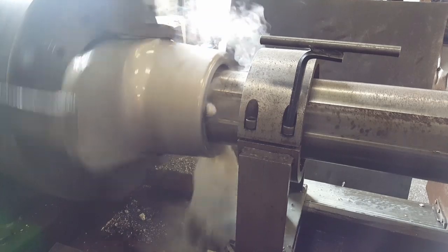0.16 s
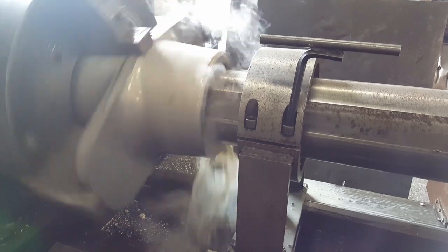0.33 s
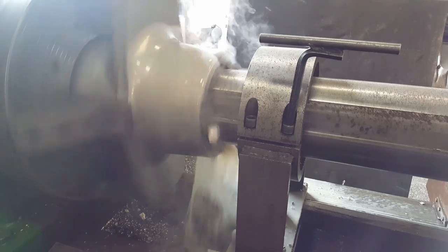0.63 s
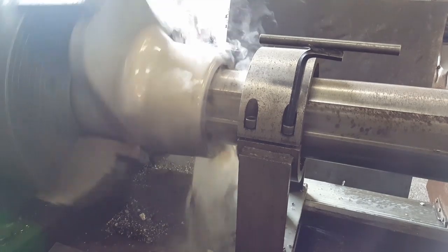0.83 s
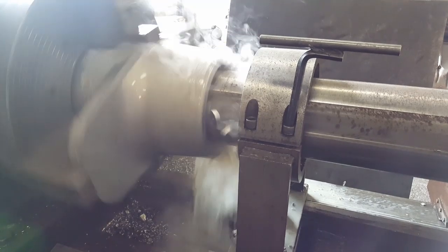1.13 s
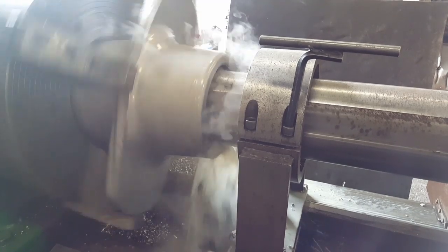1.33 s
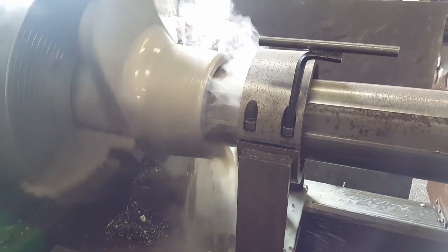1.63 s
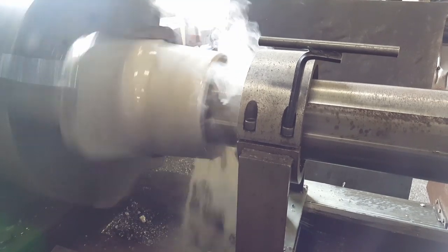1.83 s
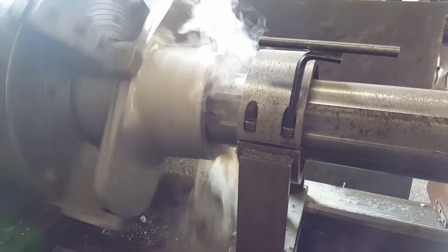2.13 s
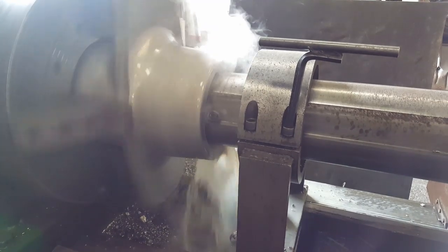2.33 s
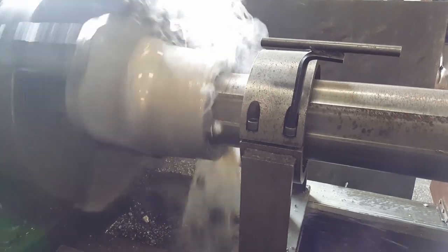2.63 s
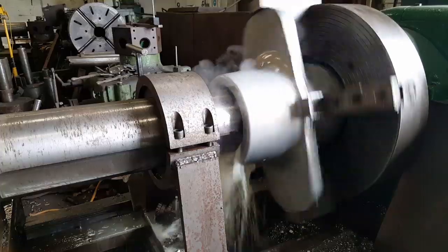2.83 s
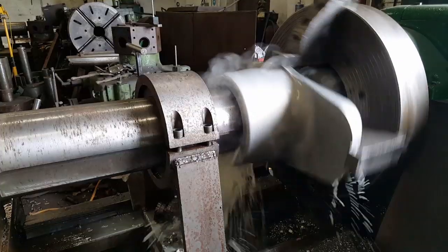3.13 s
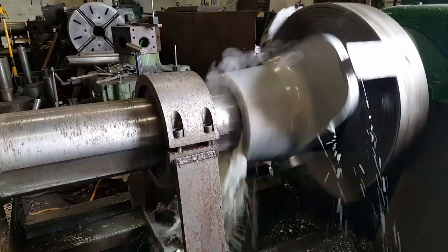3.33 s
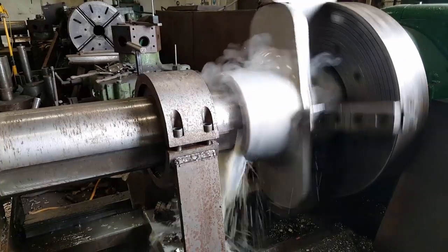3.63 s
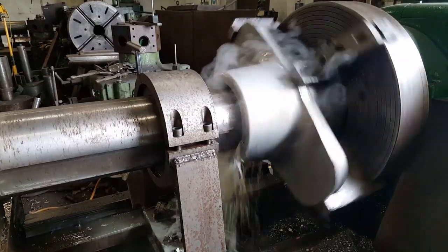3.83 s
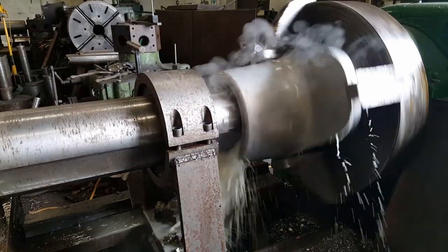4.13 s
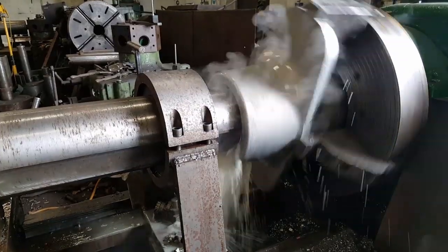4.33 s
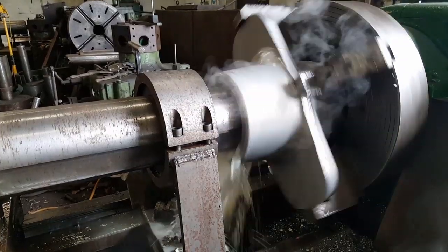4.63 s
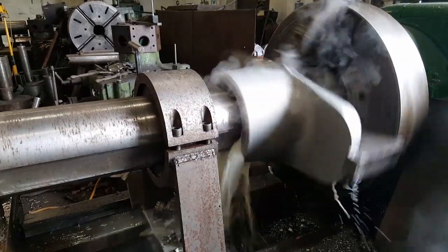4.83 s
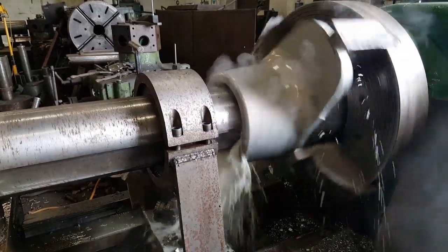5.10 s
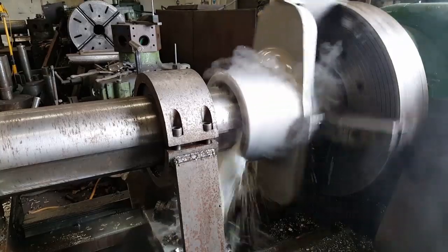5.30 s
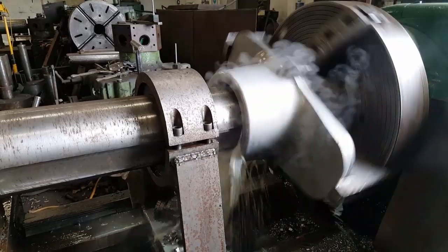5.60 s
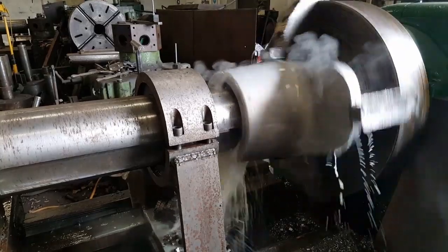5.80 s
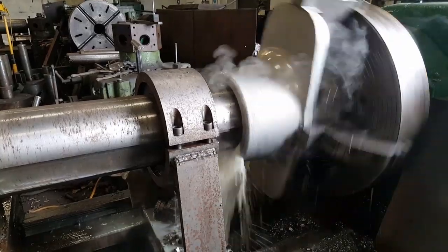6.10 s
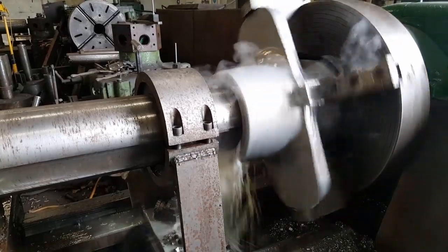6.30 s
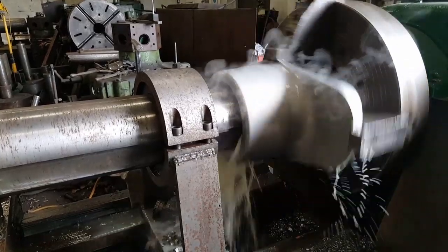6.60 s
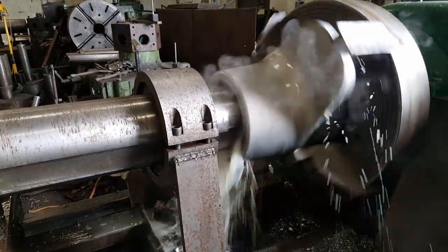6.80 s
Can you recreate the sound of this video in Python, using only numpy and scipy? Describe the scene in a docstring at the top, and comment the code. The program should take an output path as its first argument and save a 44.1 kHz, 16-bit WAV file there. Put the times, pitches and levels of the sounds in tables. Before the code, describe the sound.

Lathe tool screeching against spinning metal under coolant, rough and wavering, with low machine hum; a tiny silent gap, then a slightly lower, louder squeal.

```python
"""A wobbling metallic squeal opens at once over gear hum, rumble and wet sizzle, with whistles and snaps on top.
A lathe bores hard metal under coolant, heard from one side of the bed, then after a short silence from the other.
The squeal is a stick-slip tone with overtones, lifted by body resonances, direct and through a reverberant shop.
The hum is a stack of cosines, the wavering tones are noise through narrow resonances, rumble and sizzle are
banded noise; whistles are thin sines and snapping chips are noise bursts with a short ring."""
import sys
import numpy as np
from scipy import signal
from scipy.io import wavfile
from scipy.ndimage import uniform_filter1d

SR = 44100
rng = np.random.default_rng(int(sys.argv[2]) if len(sys.argv) > 2 else 0)


def materialize(psi):
    """Save the field psi as 16-bit PCM at rate SR to the path in sys.argv[1].

    A 1-D psi becomes a single channel; in a 2-D psi each row is a channel.
    """
    bounded = np.clip(np.atleast_2d(psi).T, -1, 1)
    quanta = np.round(bounded * 32767).astype(np.int16)
    wavfile.write(sys.argv[1], SR, quanta)


N = 306495


def from_db(db):
    """Amplitude gain of a level in dB."""
    return 10 ** (np.asarray(db) / 20)


def rms_one(x):
    """Scale a signal to rms 1."""
    return x / np.sqrt(np.mean(x ** 2) + 1e-20)


def in_time(rows, t):
    """Read the columns of a table at the times t, in straight lines between rows."""
    s, *columns = np.transpose(rows)
    return [np.interp(t, s, column) for column in columns]


def at_hz(points, hz):
    """Read a curve over frequency, in straight lines on a log-frequency axis."""
    points = np.array(points)
    return np.interp(np.log(hz), np.log(points[:, 0]), points[:, 1])


def drift(size, rate):
    """Slow random wander of spread 1: noise twice through a one-pole low-pass at rate Hz."""
    step, settle = 20, 3000   # one value per 20 samples; the filter start is thrown away
    keep = np.exp(-2 * np.pi * rate * step / SR)
    noise = rng.standard_normal(size // step + settle + 2)
    slow = signal.lfilter([1], [1, -2 * keep, keep * keep], noise)[settle:]
    slow = rms_one(slow - slow.mean())
    return np.interp(np.arange(size) / step, np.arange(len(slow)), slow)


def cycle(t, per_s, crest_s):
    """Cosine swing with a crest at crest_s."""
    return np.cos(2 * np.pi * per_s * (t - crest_s))


def bump(t, s, spread_s):
    """Bell-shaped moment around s."""
    return np.exp(-.5 * ((t - s) / spread_s) ** 2)


def resonance(x, hz, width):
    """Two-pole resonance of the given width in Hz, with a gain near 1 at its peak."""
    r = np.exp(-np.pi * width / SR)
    poles = [1, -2 * r * np.cos(2 * np.pi * hz / SR), r * r]
    return signal.lfilter([(1 - r * r) / 2, 0, (r * r - 1) / 2], poles, x)


def panned(x, pan_db):
    """Set left and right pan_db apart; positive leans left."""
    return x * from_db(np.array([[.5], [-.5]]) * pan_db)


def stereo(mid, side, alike):
    """Mix shared and opposed noise so that left and right correlate by alike, from -1 to 1."""
    return np.sqrt(1 + alike) * mid + np.sqrt(1 - alike) * side * [[1], [-1]]


# Stereo image of the noise, wide at the top. Each row: frequency in Hz, left-right correlation.
LIKENESS = [(60, 1), (290, 0.88), (630, 0.61), (1400, 0.34), (2200, 0.24), (4000, 0.4), (8000, -0.13),
            (13000, -0.27)]


def likeness(hz):
    """Left-right correlation of noise around a frequency."""
    return np.clip(at_hz(LIKENESS, hz), -1, 1)


def banded_noise(size, spectrum, patchy_db, patch_rate):
    """Stereo noise in quarter-octave bands, each with its own level, flicker and image: (centres, bands)."""
    low_hz, high_hz = spectrum[0][0], spectrum[-1][0]
    edges = np.geomspace(low_hz, high_hz, 1 + round(4 * np.log2(high_hz / low_hz)))
    centres = np.sqrt(edges[1:] * edges[:-1])
    white = rng.standard_normal((2, 2, size))   # neighbouring bands take turns with two noise pairs
    bands = []
    for k, hz in enumerate(centres):
        band_pass = signal.butter(2, edges[k:k + 2], "band", fs=SR, output="sos")
        mid, side = signal.sosfilt(band_pass, white[k % 2])
        gain = from_db(at_hz(spectrum, hz) + patchy_db * drift(size, patch_rate))
        bands.append(gain * stereo(mid, side, likeness(hz)))
    return centres, np.array(bands)


# Shaft and jitter settings. Each row is one place: shaft turns per second, hum crest in seconds,
# pitch jitter in Hz, jitter rate in Hz, slow-shaft throb crest in seconds.
DRIVE = [(11.645, .057, 33.3, 64.5, 0.092), (11.615, 2.876, 54.8, 71, 2.53)]
# Pitch line of the squeal, swinging with gear shaft and cutting load. One list per place;
# each row: time in seconds, stick-slip rate in Hz.
RATE = [
    [(0.007, 1231), (0.032, 1231), (0.07, 1338), (0.085, 1318), (0.102, 1251), (0.12, 1239), (0.152, 1356),
     (0.177, 1232), (0.187, 1227), (0.209, 1259), (0.232, 1370), (0.249, 1328), (0.269, 1246),
     (0.294, 1225), (0.329, 1345), (0.359, 1229), (0.369, 1252), (0.394, 1410), (0.421, 1418),
     (0.479, 1408), (0.526, 1272), (0.559, 1299), (0.583, 1371), (0.596, 1338), (0.616, 1244),
     (0.631, 1261), (0.648, 1334), (0.673, 1362), (0.703, 1254), (0.726, 1320), (0.798, 1300),
     (0.818, 1330), (0.865, 1334), (0.898, 1240), (0.94, 1326), (0.958, 1266), (0.975, 1261), (1.007, 1346),
     (1.05, 1249), (1.077, 1340), (1.147, 1250), (1.175, 1296), (1.215, 1273), (1.242, 1173), (1.269, 1336),
     (1.314, 1268), (1.354, 1383), (1.397, 1238), (1.432, 1290), (1.479, 1245), (1.519, 1310),
     (1.531, 1318), (1.551, 1246), (1.571, 1281), (1.606, 1267), (1.649, 1272), (1.683, 1343),
     (1.738, 1240), (1.766, 1320), (1.796, 1296), (1.813, 1193), (1.831, 1173), (1.841, 1197),
     (1.856, 1314), (1.863, 1327), (1.908, 1157), (1.943, 1328), (1.973, 1313), (1.995, 1217), (2.02, 1330),
     (2.033, 1345), (2.048, 1308), (2.068, 1355), (2.083, 1326), (2.122, 1322), (2.142, 1263),
     (2.205, 1338), (2.225, 1399), (2.26, 1308), (2.292, 1406), (2.317, 1344), (2.359, 1324), (2.377, 1380),
     (2.409, 1219), (2.437, 1253), (2.472, 1329), (2.507, 1267), (2.527, 1258), (2.554, 1428),
     (2.566, 1440), (2.574, 1413), (2.589, 1270), (2.596, 1246), (2.609, 1252), (2.639, 1338),
     (2.664, 1322), (2.679, 1256), (2.701, 1214), (2.719, 1262), (2.739, 1248)],
    [(2.857, 1129), (2.875, 1104), (2.89, 1131), (2.952, 1176), (3.007, 1063), (3.057, 1153), (3.084, 1081),
     (3.112, 1103), (3.132, 1206), (3.152, 1220), (3.174, 1154), (3.229, 1151), (3.249, 1082),
     (3.271, 1102), (3.294, 1040), (3.314, 1116), (3.356, 1147), (3.379, 1111), (3.391, 1167),
     (3.413, 1131), (3.428, 1155), (3.461, 1081), (3.493, 1138), (3.511, 1130), (3.533, 1048),
     (3.561, 1181), (3.578, 1208), (3.588, 1201), (3.608, 1084), (3.621, 1052), (3.653, 1127),
     (3.703, 1076), (3.775, 1194), (3.82, 1172), (3.848, 1094), (3.937, 1138), (3.957, 1045), (3.98, 1129),
     (4.007, 1174), (4.047, 1091), (4.072, 1187), (4.087, 1165), (4.104, 1200), (4.129, 1090),
     (4.182, 1136), (4.232, 1019), (4.262, 1106), (4.287, 1097), (4.306, 1039), (4.354, 1194),
     (4.384, 1104), (4.411, 1109), (4.434, 1161), (4.466, 1060), (4.509, 1162), (4.531, 1159),
     (4.566, 1044), (4.583, 1041), (4.606, 1128), (4.661, 1093), (4.696, 1188), (4.726, 1103),
     (4.785, 1155), (4.83, 1055), (4.905, 1175), (4.923, 1098), (4.94, 1119), (4.987, 1089), (5.062, 1184),
     (5.092, 1115), (5.122, 1150), (5.189, 1068), (5.224, 1076), (5.254, 1163), (5.279, 1159),
     (5.294, 1182), (5.334, 1061), (5.377, 1072), (5.394, 1109), (5.434, 1023), (5.454, 1113),
     (5.481, 1186), (5.544, 1237), (5.564, 1206), (5.589, 1099), (5.648, 1144), (5.663, 1091),
     (5.686, 1072), (5.723, 1143), (5.751, 1103), (5.783, 1130), (5.803, 1206), (5.835, 1090),
     (5.858, 1070), (5.9, 1124), (5.925, 1100), (5.945, 1031), (5.993, 1180), (6.013, 1080), (6.02, 1054),
     (6.045, 1083), (6.065, 1133), (6.08, 1105), (6.117, 1121), (6.132, 1103), (6.165, 1179), (6.197, 1064),
     (6.22, 1175), (6.235, 1150), (6.272, 1167), (6.302, 1072), (6.327, 1178), (6.349, 1178), (6.372, 1109),
     (6.429, 1152), (6.469, 1033), (6.501, 1090), (6.516, 1135), (6.551, 1056), (6.604, 1147),
     (6.644, 1080), (6.694, 1113), (6.726, 1030), (6.758, 1119), (6.786, 1203), (6.831, 1160),
     (6.853, 1258), (6.901, 1090), (6.923, 1257), (6.943, 1210)],
]
# Regular pitch wobble once per shaft turn, added to the pitch line. Each row is one place:
# swing in Hz, crest in seconds.
GEAR_WOBBLE = [(25.3, 0.0672), (10.1, 2.887)]
# The chip catches or tears free and the pitch lurches. Each row: time in seconds, jump in Hz.
LURCHES = [(.105, -170), (0.704, -140), (1.306, -170), (1.389, -130), (1.552, -150), (2.085, -110),
           (2.16, -90), (3.82, 149.5), (4.198, -68.5), (5.19, -62.5), (5.215, 150), (6.7, 88.5),
           (6.887, -120)]
LURCH_SPREAD_S = .007


def slip_rate(t, place):
    """Stick-slip rate in Hz: follows the load and the gear shaft; the chip flow shakes and jerks it."""
    turns, _, jitter_hz, jitter_rate, _ = DRIVE[place]
    swing_hz, crest_s = GEAR_WOBBLE[place]
    line = uniform_filter1d(in_time(RATE[place], t)[0], size=300)
    shake = drift(t.size, jitter_rate)
    shake = rms_one(shake - uniform_filter1d(shake, size=1200))   # quick shaking only
    lurching = sum(hz * bump(t, s, LURCH_SPREAD_S) for s, hz in LURCHES)
    return line + swing_hz * cycle(t, turns, crest_s) + jitter_hz * shake + lurching


SPINDLE_PER_S = .575   # turns of the work
SHOP_T60_S, SHOP_DULL_HZ = 0.19, 3040   # decay time, low-pass corner of the reflections


def shop(x, alike):
    """Dense reflections, partly shared by both sides; the turning work keeps changing which ones are fed."""
    t = np.arange(SR // 6) / SR
    turn = 2 * np.pi * SPINDLE_PER_S * np.arange(x.size) / SR
    dull = np.exp(-2 * np.pi * SHOP_DULL_HZ / SR)
    decay = np.exp(-np.log(1000) * t / SHOP_T60_S) * (t > .003)   # nothing in the first 3 ms
    out = 0
    for facing in (np.cos(turn), np.sin(turn)):
        mid, side = rng.standard_normal((2, len(t))) * decay
        echoes = signal.lfilter([1], [1, -dull], stereo(mid, side, alike))
        fed = np.float32(facing * x)[None]
        out = out + signal.oaconvolve(fed, np.float32(echoes))[:, :x.size]
    return rms_one(out)


# Partials of the squeal, the first being the fundamental. One list per place; each row: multiple of the
# slip rate, level in dB against the squeal, flutter in dB, direct sound in dB against the shop,
# left minus right in dB, delay of the right side in ms.
OVERTONES = [
    [(1, 7, 3.5, 2, -0.5, 0.12), (2, -8.5, 6, 5, 0.5, 0.081), (3, -12, 6, 6.5, 4, 0.06),
     (4, -18, 9, 10.5, -4, 0.059)],
    [(1, 4.5, 1.5, -2, 0.8, 0.1), (2, -13, 5, 8, 2, 0.14), (3, -17.5, 6, 6, 0, 0.076),
     (4, -24.5, 6, 7, -1, 0.072)],
]
# Bar and workpiece modes that colour the squeal. One list per place; each row: frequency in Hz,
# width in Hz, lift in dB (negative dips).
BODY = [
    [(1003, 57, 7), (1176, 50, 3.5), (1318, 60, -2), (1437, 140, 7), (2520, 99, 4), (5500, 270, 8)],
    [(1068, 93, 6.5), (1268, 240, 4), (1287, 83, 13), (1407, 164, 16.5), (2020, 110, 6.5), (2610, 260, 7),
     (3300, 270, 2), (4000, 120, 8)],
]
# Squeal fader that scales all partials. One list per place; each row: time in seconds, level in dB.
SQUEAL = [
    [(0.0, -20), (0.99, -20.5), (1.06, -17.5), (1.16, -23.5), (1.19, -19), (2.04, -21), (2.13, -18),
     (2.2, -20), (2.74, -19.5)],
    [(2.86, -13.5), (3.52, -15), (3.66, -10.5), (3.75, -16), (4.31, -13), (4.33, -17.5), (4.45, -14.5),
     (6.93, -14.5), (6.95, -20)],
]
OVERTONE_WANDER_DB = .6   # slow level wander, once more for each step above the fundamental


def squeal(t, place):
    """The tool sticks and slips: a tone with overtones, lifted by bar and work, direct and through the shop."""
    level_db, = in_time(SQUEAL[place], t)
    run_in = SR // 6   # the shop is already ringing at the start
    t = np.r_[t[0] - np.arange(run_in, 0, -1) / SR, t]
    hz = slip_rate(t, place)
    phase = 2 * np.pi * np.cumsum(hz) / SR
    out = 0
    for multiple, tone_db, flutter_db, direct_db, pan_db, late_ms in OVERTONES[place]:
        flutter = from_db(flutter_db * drift(t.size, 110))
        tone = flutter * np.sin(round(multiple) * phase)
        for mode_hz, width, lift_db in BODY[place]:
            if abs(mode_hz / hz.mean() - multiple) < .5:   # only modes within reach of this partial
                tone = tone + (from_db(lift_db) - 1) * resonance(tone, mode_hz, width)
        direct = rms_one(np.array([tone, np.interp(t - late_ms / 1000, t, tone)]))
        heard = from_db(direct_db) * direct + shop(tone, alike=0.5)
        power = uniform_filter1d(np.mean(heard ** 2, axis=0), size=2000)
        evened = heard / np.sqrt(power)   # running level evened over 2000 samples
        wander_db = OVERTONE_WANDER_DB * (multiple - 1) * drift(t.size, 15)
        out = out + from_db(tone_db + wander_db) * panned(evened, pan_db)
    return from_db(level_db) * out[:, run_in:]


THROB_PER_S, THROB_HUM, THROB_BASS = 3.26, .25, .3   # slow shaft turns per s, depth on hum, depth on bass


def throb(t, place, depth):
    """Swelling once per turn of the slow shaft."""
    return 1 + depth * cycle(t, THROB_PER_S, DRIVE[place][4])


# Hum of a 19-tooth gear on an uneven shaft. One list per place; each row: multiple of shaft speed,
# rms level in dB before drift and throb.
GEAR = [
    [(18, -41), (19, -32.5), (20, -31), (21, -43.5), (38, -44)],
    [(17, -59), (18, -36.5), (19, -33), (20, -35), (21, -40), (35, -47), (36, -61), (37, -45.5), (38, -52)],
]


def gears(t, place):
    """Tooth mesh and its side tones, loosely in step once per shaft turn so that the hum beats."""
    turns, crest_s = DRIVE[place][:2]
    angle = 2 * np.pi * turns * (t - crest_s)
    hum = 0
    for multiple, db in GEAR[place]:
        level = from_db(db + 1.5 * drift(t.size, 1.4))
        hum = hum + level * np.cos(round(multiple) * angle + 0.35 * drift(t.size, 2.2))
    return np.sqrt(2) * hum * throb(t, place, THROB_HUM)


# Wavering tones of drive and casting. One list per place; each row: frequency in Hz,
# width in Hz of each resonance pass, rms level in dB.
TONES = [
    [(110.8, 8, -40.5), (146, 20, -46), (290.3, 22, -38), (487, 21, -55), (553, 14, -44), (623, 23, -38.5),
     (685, 5.4, -36.5), (881, 2.8, -44.5), (2146, 60, -44.5), (8910, 170, -47.5)],
    [(110.7, 20, -43.5), (148.3, 7.9, -52.5), (269, 53, -37), (4060, 100, -49), (6470, 110, -44)],
]


def tones(t, place):
    """Drive and casting ring under random excitation: noise twice through narrow resonances."""
    out = 0
    for hz, width, db in TONES[place]:
        once = resonance(rng.standard_normal((2, t.size)), hz, width)
        mid, side = resonance(once, hz, width)
        out = out + from_db(db) * rms_one(stereo(mid, side, likeness(hz)))
    return out


# Rumble fader. Each row is one place: mean in dB before the make-up gain, swing per slow shaft turn in dB.
RUMBLE_LEVEL = [(-24, 1), (-27, 0.5)]
RUMBLE_LAG_S, RUMBLE_WANDER_DB = 0.056, 1.63   # swell crest after the throb crest, random wander


def rumble_level(t, place):
    """Level in dB that swells with the slow shaft and wanders."""
    mean_db, swing_db = RUMBLE_LEVEL[place]
    swell = swing_db * cycle(t, THROB_PER_S, DRIVE[place][4] + RUMBLE_LAG_S)
    return mean_db + swell + RUMBLE_WANDER_DB * drift(t.size, 8.0)


# Rumble colour. One list per place; each row: frequency in Hz, relative density in dB per Hz.
RUMBLE = [
    [(25, -43), (45, -43), (62, -15.5), (85, -11.5), (115, -2), (190, -0.5), (240, -0.5), (330, -6.5),
     (500, -0.5), (800, -7.5), (1500, 2), (2050, -12.5), (2600, -13)],
    [(25, -38.5), (45, -35), (62, -15.5), (85, -20), (115, -4), (190, -5), (240, -8.5), (330, -9.5),
     (430, -4), (800, -9.5), (1450, -2), (1800, -30.5), (2600, -6.5)],
]


def rumble(t, place):
    """Broad machine noise in bands; the bass below 200 Hz throbs with the slow shaft."""
    centres, bands = banded_noise(t.size, RUMBLE[place], patchy_db=1.2, patch_rate=6.0)
    bass, rest = bands[centres < 200].sum(0), bands[centres >= 200].sum(0)
    noise = rms_one(bass * throb(t, place, THROB_BASS) + rest)
    return from_db(rumble_level(t, place) + 3) * noise   # 3 dB make-up gain


# Sizzle fader, swelling as the work turns. Each row is one place: mean in dB before the make-up gain,
# swing per work turn in dB, its crest in seconds, swing per chuck jaw in dB, its crest in seconds.
SIZZLE_LEVEL = [(-33, 2, 1.97, 0.5, 1.37), (-33, 2.0, 4.15, 0, 5.7)]
# Brief swells and drops of the sizzle. Each row: time in seconds, bell spread in seconds, change in dB.
SWELLS = [(.6, 0.023, 4), (0.743, 0.027, -0.5), (.9, 0.037, -4), (0.961, .01, 4), (1.552, 0.013, 7.5),
          (1.784, .02, 3), (2.04, 0.026, 3), (2.22, 0.052, -4.5), (2.33, 0.034, 2.5), (2.618, .05, -3),
          (3.6, .05, 1.5), (3.904, 0.03, 2.5), (4.35, 0.043, 4), (4.598, 0.04, -1), (5.201, 0.024, 5),
          (5.4, 0.045, -1.5), (6.444, 0.034, 3)]
JAWS, SIZZLE_WANDER_DB = 4, 0.2   # chuck jaws per turn, random wander


def sizzle_level(t, place):
    """Level in dB that swells per turn of the work and per chuck jaw, wanders, and briefly swells or drops."""
    mean_db, turn_db, turn_s, jaw_db, jaw_s = SIZZLE_LEVEL[place]
    turning = turn_db * cycle(t, SPINDLE_PER_S, turn_s) + jaw_db * cycle(t, JAWS * SPINDLE_PER_S, jaw_s)
    moments = sum(db * bump(t, s, spread_s) for s, spread_s, db in SWELLS)
    return mean_db + turning + SIZZLE_WANDER_DB * drift(t.size, 5.4) + moments


# Sizzle colour. One list per place; each row: frequency in Hz, relative density in dB per Hz.
SIZZLE = [
    [(1500, -9), (3100, -1.5), (5000, -2.5), (6400, -5.5), (8000, -2), (9800, -12), (10600, -31),
     (13500, -20.5), (15000, -24)],
    [(1500, 4.5), (2900, -2), (3800, -0.5), (5000, -2.5), (7000, -2.5), (7900, 0), (9800, -19),
     (10900, -26), (13500, -12.5), (15000, -28)],
]
# Sizzle placement. Each row: frequency in Hz, left minus right in dB.
SIZZLE_PAN = [(2000, 1), (7800, .5), (10000, 3), (14000, 6.5)]


def sizzle(t, place):
    """Coolant and chips hiss and spit: random splashes start at once and die in a few ms, in all bands."""
    struck = rng.random(t.size) < 45 / SR   # 45 splashes per second on average
    spits = struck * np.minimum(rng.exponential(1, t.size), 2.5)
    spray = 1 + 0.47 * signal.lfilter([1], [1, -np.exp(-1 / (0.0065 * SR))], spits)
    centres, bands = banded_noise(t.size, SIZZLE[place], patchy_db=1.5, patch_rate=9.2)
    hiss = sum(panned(band, at_hz(SIZZLE_PAN, hz)) for hz, band in zip(centres, bands))
    return from_db(sizzle_level(t, place) + 2.5) * rms_one(hiss * spray)   # 2.5 dB make-up gain


# Short whistles, heard at the first place only. Each row: start in seconds, length in seconds,
# rms level in dB that the tone builds towards.
WHISTLES = [(0.068, 0.032, -36), (0.132, 0.028, -39), (0.384, 0.11, -32), (0.832, 0.052, -32),
            (1.328, .03, -32), (1.778, 0.021, -32), (2.033, 0.037, -37), (2.155, 0.089, -35),
            (2.303, 0.028, -42.5), (2.554, 0.049, -30)]
WHISTLE_HZ = 4285


def whistles():
    """One sharp mode of the bar: a thin tone that sets in quickly, holds and rings out."""
    t = np.arange(N) / SR
    held = sum(from_db(db) * ((t > s) & (t < s + length)) for s, length, db in WHISTLES)
    keep = np.exp(-1 / (0.0072 * SR))   # builds and rings out with a 7.2 ms time constant
    level = signal.lfilter([1 - keep], [1, -keep], held) * (t < STANDS[0][1])
    phase = 2 * np.pi * WHISTLE_HZ * t + 0.48 * drift(N, 11)
    return np.sqrt(2) * level * np.sin(phase + np.array([[-.45], [.45]]))   # sides 0.9 rad apart


# Chips snapping off. Each row: start in seconds, level in dB before the make-up gain, ring in Hz.
CHIPS = [(0.1047, -29, 5560), (0.9584, -33, 7560), (1.075, -28, 4000), (1.129, -26, 3976),
         (1.272, -33, 5400), (1.3869, -32, 4810), (1.9023, -26, 4486), (2.0294, -22.5, 4045),
         (2.5687, -46, 4314), (3.3329, -30.5, 7860), (3.5324, -30, 4130), (5.2194, -36, 7523),
         (6.6553, -29, 4334)]


def chips():
    """Each snap is a bright noise burst of a few ms with a short ring."""
    out = np.zeros((2, N))
    t = np.arange(2000) / SR
    bright = signal.butter(8, [4000, 9500], "band", fs=SR, output="sos")
    bursts = signal.sosfilt(bright, rng.standard_normal((len(CHIPS), 2, t.size)))
    for (s, db, hz), burst in zip(CHIPS, bursts):
        crack = 0.8 * burst * np.exp(-t / 0.0039)
        ring = .5 * np.sin(2 * np.pi * hz * t) * np.exp(-t / 0.0071)
        first = round(s * SR)
        out[:, first:first + t.size] += from_db(db + 11.5) * (crack + ring)   # 11.5 dB make-up gain
    return out


# The two listening places. Each row: start in seconds, end in seconds.
STANDS = [(0, 2.7478), (2.8447, 6.95)]


def scene():
    """Play both listening places, with silence between them."""
    out = whistles() + chips()
    for place, (start, end) in enumerate(STANDS):
        span = slice(round(start * SR), min(round(end * SR), N))
        t = np.arange(N)[span] / SR
        out[:, span] += squeal(t, place) + gears(t, place) + tones(t, place)
        out[:, span] += rumble(t, place) + sizzle(t, place)
    return out


CUTOFF_HZ = 14900   # everything above is down by at least 80 dB


def record(dry):
    """Round the peaks softly below 0.98 and cut the top steeply."""
    rounded = dry / (1 + (dry / .98) ** 6) ** (1 / 6)
    return signal.sosfilt(signal.cheby2(16, 80, CUTOFF_HZ, fs=SR, output="sos"), rounded)


dry = scene()
out = record(dry)
materialize(out)
```